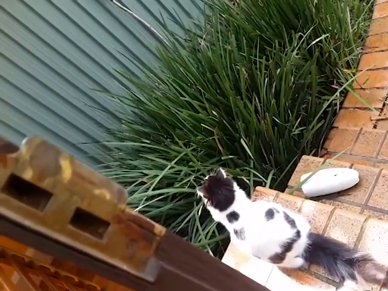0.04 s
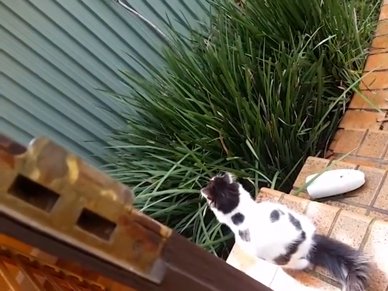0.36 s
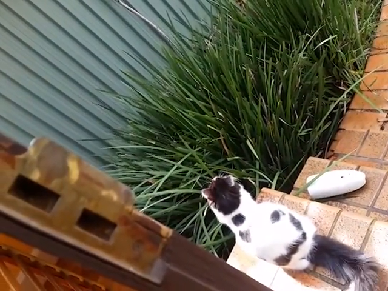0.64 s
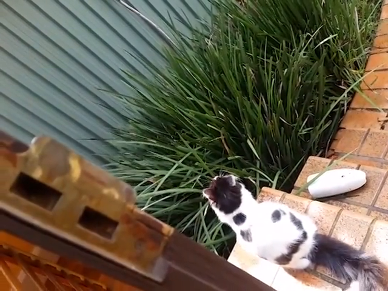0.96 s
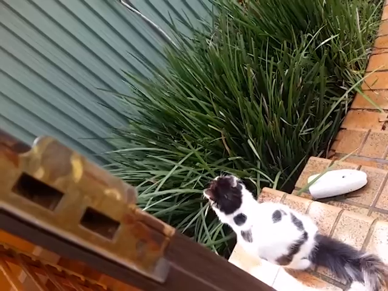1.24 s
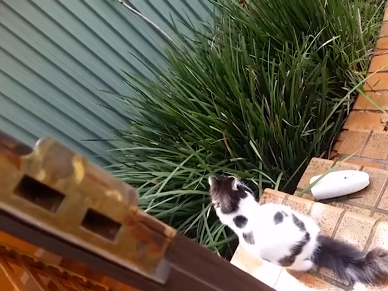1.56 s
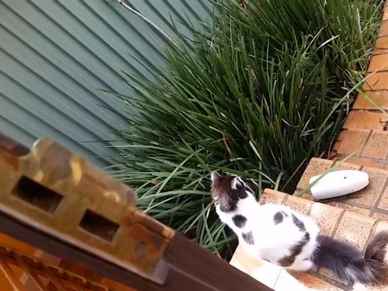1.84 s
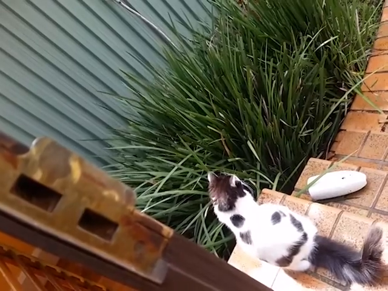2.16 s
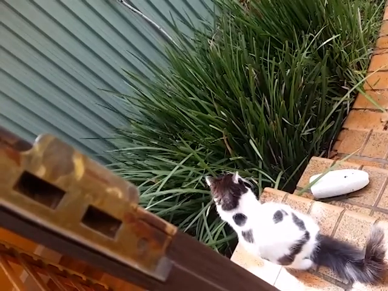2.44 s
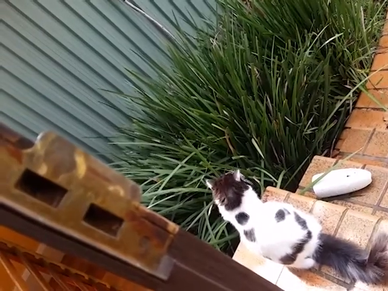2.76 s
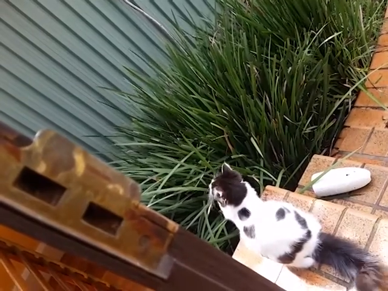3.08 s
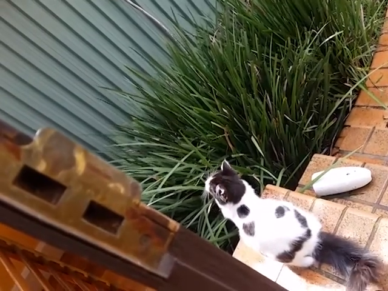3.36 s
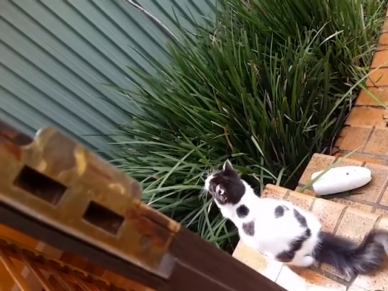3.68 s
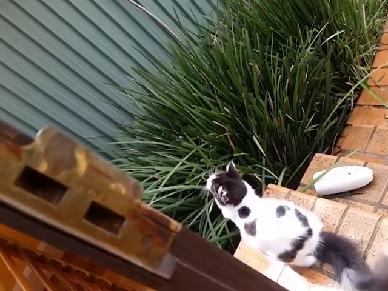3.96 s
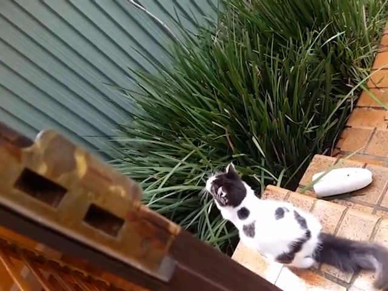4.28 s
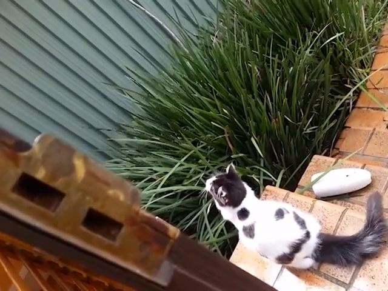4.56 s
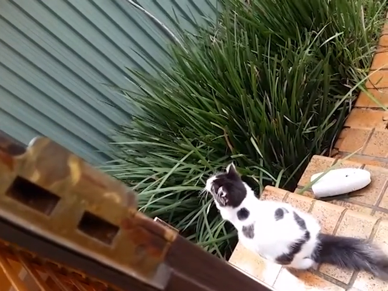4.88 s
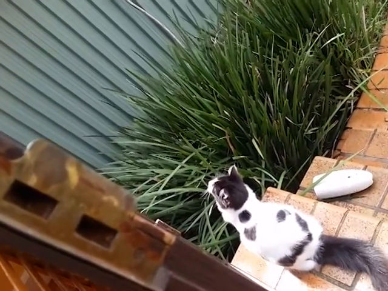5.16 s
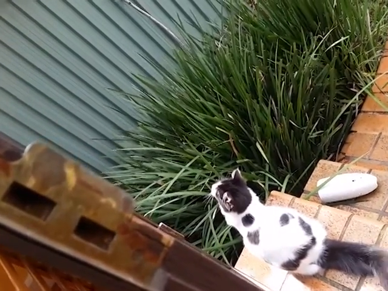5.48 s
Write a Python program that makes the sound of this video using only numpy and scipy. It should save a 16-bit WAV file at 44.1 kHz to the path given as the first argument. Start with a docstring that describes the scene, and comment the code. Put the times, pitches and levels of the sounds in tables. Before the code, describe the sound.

Outdoors, a light steady wind hiss and the low rumble of distant traffic run throughout. A cat spits one short puff of air at the start. A car engine across the yard revs, then settles back to an uneven idle. In the second half the cat gives two long, hoarse, quavering yowls, each clearing into a steadier note. The calls are fairly close, louder on the left, with a slight echo.

```python
"""Cat yowling on a brick step

Heard from a doorway, a cat spits one puff of air, then gives two long yowls, louder in the left
microphone. Its vocal folds quaver hoarsely and clear into a steady note; a sheet-metal fence and the
house wall throw the calls back. Across the yard, out of sight, a car engine idles and revs through its
exhaust. Light wind hisses in long leaves over distant traffic, and a small bird peeps far away."""
import sys
import numpy as np
from scipy import signal
from scipy.fft import rfft, irfft, next_fast_len
from scipy.io import wavfile
from scipy.ndimage import uniform_filter1d

SR = 44100
rng = np.random.default_rng(int(sys.argv[2]) if len(sys.argv) > 2 else 0)


def transcribe(u):
    """Save the signal u as a 16-bit wav file named by the first command-line argument.

    u: samples, shape (n,) or (channels, n), limited to [-1, 1]; the rate is SR.
    q: integer samples, one column per channel.
    """
    v = np.clip(np.atleast_2d(u).T, -1, 1)
    q = np.round(v * 32767).astype(np.int16)
    wavfile.write(sys.argv[1], SR, q)


N = 252252
TIME = np.arange(N) / SR

# how alike noise is at the two microphones: frequency_hz, likeness (capped at 1 in use)
MIC_LIKENESS = [(60, 6.9), (150, 1.9), (290, 0.6), (640, 0.8), (1400, 0.02), (3000, 0)]
# how noise leans to the left microphone: frequency_hz, left_minus_right_db
MIC_LEAN = [(60, 3), (200, 2.5), (380, 3), (700, 3.5), (1290, 5), (2400, 6.5), (3500, 15.5), (4500, 22.5),
            (5300, 13), (8000, 2), (15000, 0)]
# distant traffic and moving air: frequency_hz, density_db
AIR_SPECTRUM = [(25, -4.5), (50, -7.5), (75, -3.5), (110, -5.5), (165, -3), (225, -14.5), (330, -17),
                (450, -23), (650, -23), (1000, -30.5), (1600, -33.5), (2400, -34.5), (3000, -42.5),
                (4000, -79)]
# the steady hiss: frequency_hz, density_db
HISS_SPECTRUM = [(2700, -39.5), (3100, -9.5), (3350, 1.5), (3700, -0.5), (4150, -5), (4550, -3),
                 (4800, -17), (5100, -27.5), (6000, -32.5), (8000, -42.5), (9800, -42), (12000, -30),
                 (15500, -22.5)]
# the far bird's peeps: centre_s, pitch_hz, level_db, length_s
BIRD_PEEPS = [(0.6, 6720, -76, 0.089), (0.883, 6790, -78, 0.084), (1.199, 6720, -88, 0.069),
              (1.822, 6750, -75, 0.056)]
# leaves brushing together: frequency_hz, density_db
LEAF_SPECTRUM = [(2000, -6.5), (5200, -5.5), (6300, -1), (8000, -13.5), (12000, -23.5)]
# each stir of the leaves: start_s, level_db, rise_s, fade_db_per_s
LEAF_STIRS = [(1.25, -77, 0.26, 21.5), (4.415, -74, 0.027, 264)]
# engine speed: time_s, firing_hz
ENGINE_SPEED = [(0, 28), (.35, 28.6), (1.2, 24.5), (1.32, 37), (1.58, 45.8), (1.92, 47), (2.08, 38),
                (2.35, 32.5), (2.55, 37.1), (2.95, 37.2), (3.2, 29.7), (4.05, 27.7), (4.45, 25.3),
                (5.2, 25.5), (5.72, 31.5)]
# how hard the engine works: time_s, relative_level_db
ENGINE_LOAD = [(0.0, -38), (0.27, -36.5), (0.38, -44), (1.16, -47), (1.29, -28.5), (1.72, -27.5),
               (1.86, -31), (2.04, -28.5), (2.2, -32.5), (2.26, -58.5), (2.28, -39), (2.55, -32),
               (3.01, -40), (3.57, -34.5), (3.7, -39.5), (4.89, -51.5), (5.67, -31.5), (5.72, -50)]
# exhaust resonances from across the yard: frequency_hz, gain_db
EXHAUST_RESPONSE = [(20, -17), (28, -28), (37, -6.5), (47, -9.5), (57, -26.5), (74, 1.5), (86, -0.5),
                    (112, 0.5), (140, 2), (160, -3), (187, -3), (225, -11), (350, -12.5), (700, -26)]
# engine clatter and fan noise: frequency_hz, density_db
CLATTER_SPECTRUM = [(25, -29.5), (60, -3.5), (85, 6), (140, 0.5), (220, -11), (350, -14.5), (520, -23),
                    (1400, -26.5), (2800, -39), (4500, -42.5), (6500, -58), (9000, -66), (16000, -63)]
# the spit's puff of air: frequency_hz, density_db
SPIT_SPECTRUM = [(250, 0.5), (450, -5.5), (750, 6.5), (1000, -8.5), (1900, -3), (2400, -5.5), (3000, -15.5),
                 (4500, -19), (6000, -43), (10000, -50.5)]
# the course of the voice, one list a yowl: time_s, pitch_hz, effort_db, mouth_resonance_hz
YOWL_SHAPES = [
    [(3.09, 733.3, -55.5, 910), (3.14, 690, -47.5, 1295), (3.2, 581.5, -49.5, 1740),
     (3.26, 525, -46.5, 1670), (3.42, 513.8, -46.5, 2080), (3.55, 543.8, -43.5, 2220),
     (3.97, 555.6, -45, 2370), (4.15, 602.7, -44, 2210), (4.19, 587.7, -44.5, 2330),
     (4.43, 591, -46.5, 2170)],
    [(4.78, 435, -63, 846), (4.85, 510.2, -53, 2120), (5.14, 598.2, -46.5, 2100),
     (5.25, 643.4, -46.5, 1560), (5.29, 625.4, -44, 1960), (5.39, 627.7, -42.5, 2000),
     (5.46, 610, -44, 1860), (5.54, 632.6, -48, 1780), (5.64, 610, -48.5, 1770), (5.69, 647, -75, 1663)],
]
# bouts of quavering: start_s, end_s, opening_dips_per_s, depth_hz, hoarseness (0-1)
QUAVER_BOUTS = [(3.212, 3.826, 20.2, 80.04, .23), (3.851, 4.06, 19, 39.94, .3),
                (4.184, 4.429, 18.4, 69.5, 0.28), (4.801, 5.121, 19.2, 84.8, .21),
                (5.258, 5.463, 16.4, 45.4, .1)]
# the unmoving part of the throat: frequency_hz, gain_db
THROAT_RESPONSE = [(400, -26), (700, -10), (950, -3), (1100, -5), (1250, 2), (1460, 3), (1660, -5),
                   (1820, -3), (2020, -8), (2200, 2), (2450, -1), (2700, -7), (3100, -5), (3700, -20),
                   (5000, -45)]
# air rushing through the throat: frequency_hz, density_db
BREATH_SPECTRUM = [(400, -35.5), (1700, -1), (2500, -2), (3400, -6), (4600, -28), (6500, -42), (12000, -65)]
# echoes off hard surfaces near the step: delay_s, left_gain, right_gain
WALL_ECHOES = [(.0028, .15, .35), (.0074, -.12, .3), (.0128, .16, -.3)]
# the yowls at the right microphone, lows lifted and highs shaded: frequency_hz, gain_db
RIGHT_MIC_RESPONSE = [(700, 4.5), (1000, 11), (1250, -19.5), (1450, -8.5), (1850, -10.5), (3000, -5.5)]


def gain_of(db):
    """Decibels to amplitude."""
    return 10 ** (np.asarray(db) / 20)


def unit_rms(x):
    """Scales to rms 1."""
    return x / np.sqrt(np.mean(x ** 2) + 1e-20)


def value_at(spectrum, hz):
    """Reads a spectrum on a log-frequency axis."""
    table_hz, values = np.transpose(spectrum)
    return np.interp(np.log(hz + 1), np.log(table_hz + 1), values)


def follow(rows, t):
    """Reads every column of a curve at the times t."""
    times, *columns = np.transpose(rows)
    return [np.interp(t, times, column) for column in columns]


def coloured(x, spectrum, size):
    """Filters x by a spectrum in dB, giving size samples."""
    gain = gain_of(value_at(spectrum, np.fft.rfftfreq(size, 1 / SR)))
    return irfft(rfft(x, size) * gain, size)


def drift(n, rate_hz):
    """Smooth random motion of rms 1, mostly slower than the rate."""
    hz = np.fft.rfftfreq(next_fast_len(n + SR // 2), 1 / SR)
    white = rfft(rng.standard_normal(2 * len(hz) - 2))
    return unit_rms(irfft(white * np.exp(-(hz / rate_hz) ** 2))[:n])


def swell(start_s, rise_s, fade_db_per_s, hold_s=0):
    """An envelope that rises, holds and dies away."""
    age = TIME - start_s
    return np.clip(age / rise_s, 0, 1) * gain_of(-fade_db_per_s * np.maximum(age - rise_s - hold_s, 0))


def outdoor_noise(spectrum, patchy_db, size=1024):
    """Noise with drifting patches; alike at both microphones in the bass, leaning left in the treble."""
    hz = np.fft.rfftfreq(size, 1 / SR)
    draws = rng.standard_normal((5, N // (size // 4) + 5, len(hz)))
    left, unrelated = draws[0] + 1j * draws[1], draws[2] + 1j * draws[3]
    patches = uniform_filter1d(draws[4], size=10, axis=0)
    patches = unit_rms(uniform_filter1d(patches, size=12, axis=1))
    likeness = np.clip(value_at(MIC_LIKENESS, hz), -1, 1)
    lean = gain_of(value_at(MIC_LEAN, hz))
    right = likeness * left + np.sqrt(1 - likeness ** 2) * unrelated
    frames = np.array([left * lean, right]) / np.sqrt(1 + lean ** 2 + 2 * likeness * lean)
    frames = frames * gain_of(value_at(spectrum, hz) + patchy_db * patches)
    noise = signal.istft(frames.transpose(0, 2, 1), nperseg=size, noverlap=size * 3 // 4)[1][:, :N]
    return noise / noise.mean(0).std()


def yard_echoes(x, t60_s, wet_db, build_s=0.054):
    """The yard scatters a thin tail of echoes, different at each microphone."""
    t = TIME[:SR // 2]
    taps = rng.standard_normal((2, len(t))) * (rng.random((2, len(t))) < .05)
    tail = taps * gain_of(-60 * t / t60_s) * (1 - np.exp(-t / build_s))
    tail = tail / np.linalg.norm(tail, axis=1, keepdims=True)
    return gain_of(wet_db) * signal.fftconvolve(x[None], tail, axes=1)[:, :N]


def background(air_db=-46.5, hiss_db=-60, hum_hz=165, hum_db=-52):
    """Distant traffic and moving air, a steady hiss, and a far hum that swells and fades."""
    air = gain_of(air_db) * outdoor_noise(AIR_SPECTRUM, patchy_db=2.5, size=4096)
    hiss = gain_of(hiss_db) * outdoor_noise(HISS_SPECTRUM, patchy_db=0.8)
    hum_level = gain_of(hum_db) * (1 + 0.6 * drift(N, rate_hz=2.4))
    hum = hum_level * np.sin(2 * np.pi * hum_hz * TIME + .6 * drift(N, rate_hz=2.6))
    return air + hiss + hum


def bird(waver=0.0047):
    """Thin, nearly pure peeps from far away, with the yard's echo."""
    song = np.zeros(N)
    for centre_s, pitch_hz, level_db, length_s in BIRD_PEEPS:
        inside = abs(TIME - centre_s) < length_s / 2
        hz = pitch_hz * (1 + waver * drift(inside.sum(), rate_hz=67))
        envelope = gain_of(level_db) * np.hanning(inside.sum())
        song[inside] += envelope * np.sin(2 * np.pi * np.cumsum(hz) / SR)
    return song + yard_echoes(song, t60_s=0.56, wet_db=-2.5)


def leaves():
    """The long leaves brush together now and then in the wind."""
    stirring = sum(gain_of(db) * swell(start, rise, fade) for start, db, rise, fade in LEAF_STIRS)
    return outdoor_noise(LEAF_SPECTRUM, patchy_db=5, size=512) * stirring


def exhaust(load_db, idle_hz=28.8, idle_db=-38.5, coast_db_per_octave=12.5, uneven=0.29):
    """Firing harmonics slide through the pipe's resonances; speed brightens them, pulling booms."""
    firing_hz = follow(ENGINE_SPEED, TIME)[0] * (1 + 0.0064 * drift(N, rate_hz=8.24))
    phase = 2 * np.pi * np.cumsum(firing_hz) / SR
    octaves_up = np.log2(firing_hz / idle_hz)
    pull_db = load_db - idle_db - coast_db_per_octave * octaves_up  # load beyond coasting
    tilt_db_per_octave = -0.5 + 7 * octaves_up - pull_db
    drone, power = 0, 0
    for k in range(1, 13):
        rounding_db = 11 * max(np.log2(k / 3), 0)  # rounded puffs: harmonics above the third fall away
        tilt_db = tilt_db_per_octave * np.log2(np.clip(k, 2, 5))
        strength = gain_of(value_at(EXHAUST_RESPONSE, k * firing_hz) - rounding_db + tilt_db)
        flutter = 1 + uneven * drift(N, rate_hz=15)
        drone = drone + strength * flutter * np.cos(k * phase + 2 * rng.random())
        power = power + strength ** 2 / 2
    return drone / np.sqrt(power)


def engine(exhaust_db=-1, clatter_db=-11, clatter_lag_s=0.18):
    """The car across the yard, a little left: its exhaust follows the load, its clatter lags behind."""
    load_db = follow(ENGINE_LOAD, TIME)[0]
    load = gain_of(load_db)
    drone = gain_of(exhaust_db) * np.array([[1.08], [.92]]) * exhaust(load_db)
    clatter = gain_of(clatter_db) * outdoor_noise(CLATTER_SPECTRUM, patchy_db=4, size=4096)
    pole = np.exp(-1 / (clatter_lag_s * SR))
    lagged_load = load[0] + signal.lfilter([1 - pole], [1, -pole], load - load[0])
    return load * drone + lagged_load * clatter


def spit(level_db=-46.5):
    """A sudden puff of air through the cat's open mouth."""
    envelope = swell(start_s=0.22, rise_s=0.02, hold_s=0.07, fade_db_per_s=80.5)
    return gain_of(level_db) * envelope * outdoor_noise(SPIT_SPECTRUM, patchy_db=2.5)


def quaver(t, slowing_per_s=0.17, edge_s=0.014, clear_roughness=.08, dip_share=.3):
    """Pitch sag and roughness: in each bout the voice turns hoarse and dips, ever more slowly."""
    slip_cycles = .06 * drift(len(t), rate_hz=11.56)
    uneven_depth = gain_of(1.8 * drift(len(t), rate_hz=21))
    sag_hz, roughness = 0, clear_roughness
    for start_s, end_s, dips_per_s, depth_hz, hoarseness in QUAVER_BOUTS:
        age = np.maximum(t - start_s, 0)
        bout = np.clip(np.minimum(age, end_s - t) / edge_s, 0, 1)
        cycles = dips_per_s * np.log1p(slowing_per_s * age) / slowing_per_s + slip_cycles
        dip = abs(np.sin(np.pi * cycles)) ** 2.8  # the power narrows each dip
        sag_hz = sag_hz + bout * depth_hz * uneven_depth * dip
        roughness = roughness + bout * hoarseness * (1 + dip_share * (2 * dip - 1))
    return sag_hz, roughness


def mouth_gain(hz, resonance_hz, age, open_width_hz=850, opening_s=0.34, floor_db=-14):
    """The mouth's resonance broadens as the jaw drops; a little passes below it, less far above."""
    width_hz = open_width_hz * (1 - np.exp(-age / opening_s)) + 1
    above = (hz - resonance_hz) / (width_hz / 2)
    return 1 / np.hypot(1, above) + gain_of(floor_db) / np.hypot(1, np.maximum(above, 0))


def breath(phase):
    """Air rushes through the hoarse folds in puffs, one a cycle."""
    puffs = rng.standard_normal(len(phase)) * (1 + np.cos(phase))
    return unit_rms(coloured(puffs, BREATH_SPECTRUM, len(phase)))


def yowl(shape, jitter=.04, shimmer=.6, rasp=.75, sag_db_per_hz=.035, attack_s=0.016, release_s=0.028):
    """Vocal folds drive the throat and opening mouth; at each dip the pitch sags, the voice weakens."""
    inside = (TIME >= shape[0][0]) & (TIME < shape[-1][0])
    t = TIME[inside]
    age, n = t - t[0], len(t)
    pitch_hz, effort_db, mouth_hz = follow(shape, t)
    sag_hz, roughness = quaver(t)
    pitch_hz = (pitch_hz - sag_hz) * (1 + jitter * roughness * drift(n, rate_hz=140))
    phase = 2 * np.pi * np.cumsum(pitch_hz) / SR
    voice, power = 0, 0
    for k in range(1, 8):
        flutter_db = 7 * roughness * drift(n, rate_hz=38)
        throat = gain_of(value_at(THROAT_RESPONSE, k * pitch_hz) + flutter_db)
        strength = throat * mouth_gain(k * pitch_hz, mouth_hz, age)
        # uneven closures of the folds spread each harmonic into a noisy skirt, the high ones most
        spread = rasp * roughness * k / 4
        skirt = spread * (drift(n, rate_hz=350) + 1j * drift(n, rate_hz=350))
        voice = voice + strength * ((1 + skirt) * np.exp(1j * k * phase)).real
        power = power + strength ** 2 * (.5 + spread ** 2)
    voice = voice / np.sqrt(uniform_filter1d(power, size=2000))
    voice = voice + gain_of(-1) * roughness * breath(phase)
    voice = voice * (1 + shimmer * roughness * drift(n, rate_hz=160))
    envelope = np.minimum(age / attack_s, 1) * np.minimum((t[-1] - t) / release_s, 1)
    call = np.zeros(N)
    call[inside] = voice * gain_of(effort_db - sag_db_per_hz * sag_hz) * envelope
    return call


def cat(gain_db=3, right_lag_samples=15):
    """The yowls from the step reach the left microphone first, with echoes from fence, wall and yard."""
    voice = sum(yowl(shape) for shape in YOWL_SHAPES)
    direct = np.array([voice, np.roll(voice, right_lag_samples)])
    left, right = direct + yard_echoes(voice, t60_s=.2, wet_db=-9)
    for delay_s, left_gain, right_gain in WALL_ECHOES:
        echo = np.pad(voice, (round(delay_s * SR), 0))[:N]
        left, right = left + left_gain * echo, right + right_gain * echo
    right = coloured(right, RIGHT_MIC_RESPONSE, 2 * N)[:N]
    return gain_of(gain_db) * np.array([left, right])


def scene():
    """Everything that reaches the two microphones in the doorway."""
    return cat() + spit() + engine() + background() + leaves() + bird()


def record(dry, band_limit_hz=15800):
    """The recorder's band limit, with a soft start and stop."""
    faded = dry * signal.windows.tukey(N, .003)
    lowpass = signal.firwin(511, band_limit_hz, window=("kaiser", 9), fs=SR)
    return signal.oaconvolve(faded, lowpass[None], "same")


dry = scene()
out = record(dry)
transcribe(out)
```